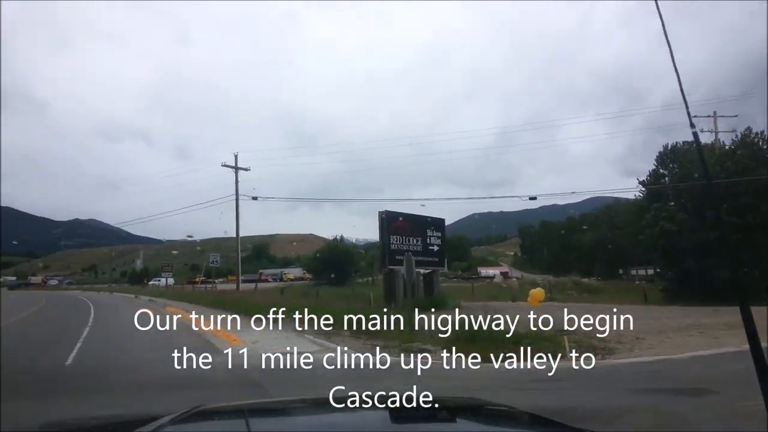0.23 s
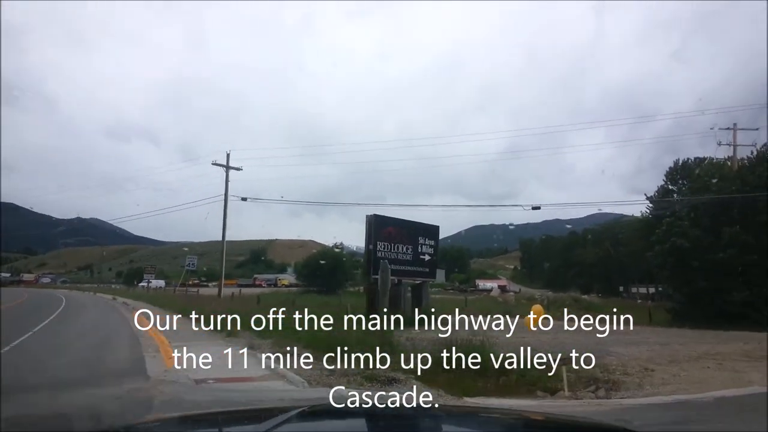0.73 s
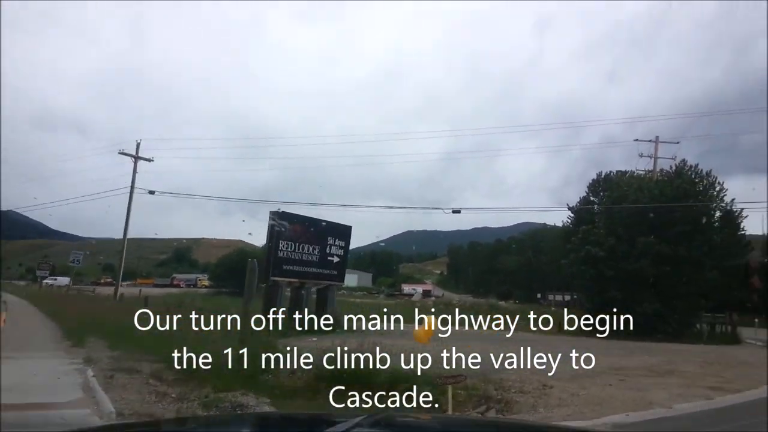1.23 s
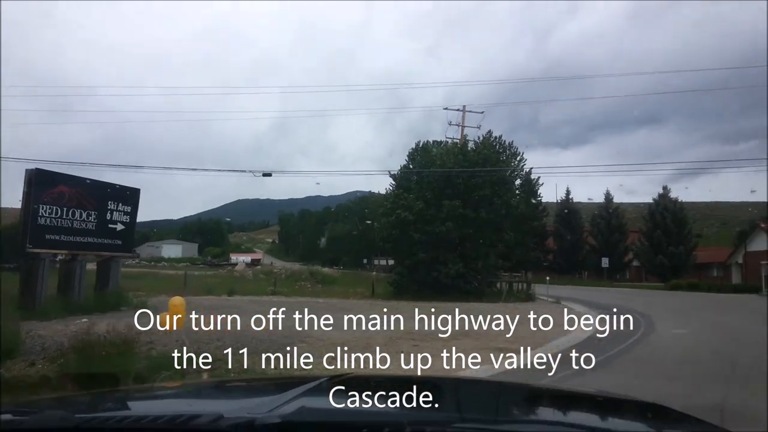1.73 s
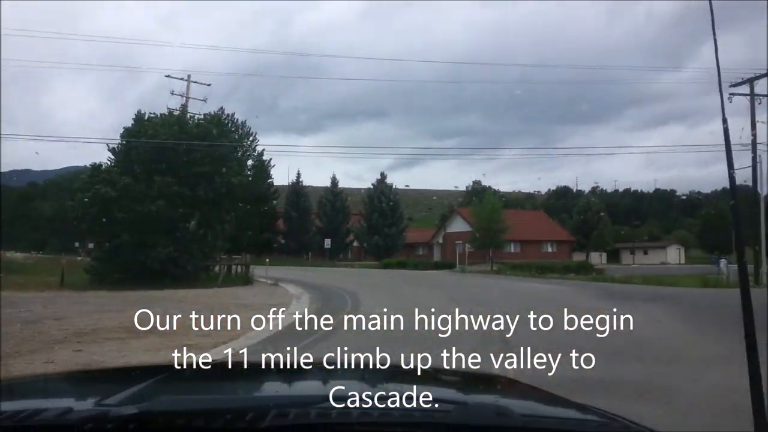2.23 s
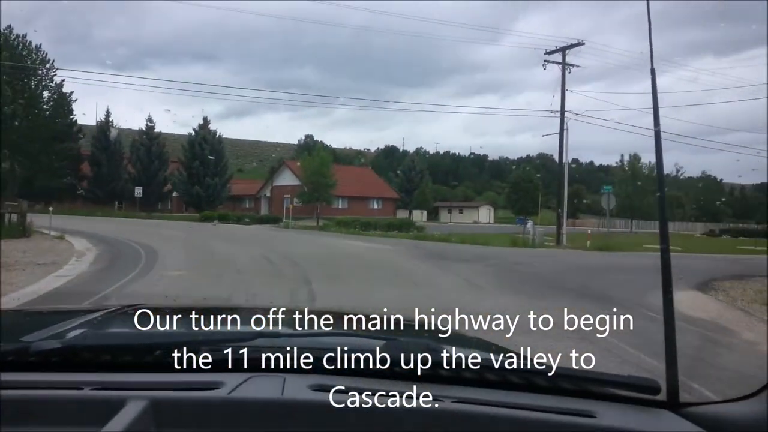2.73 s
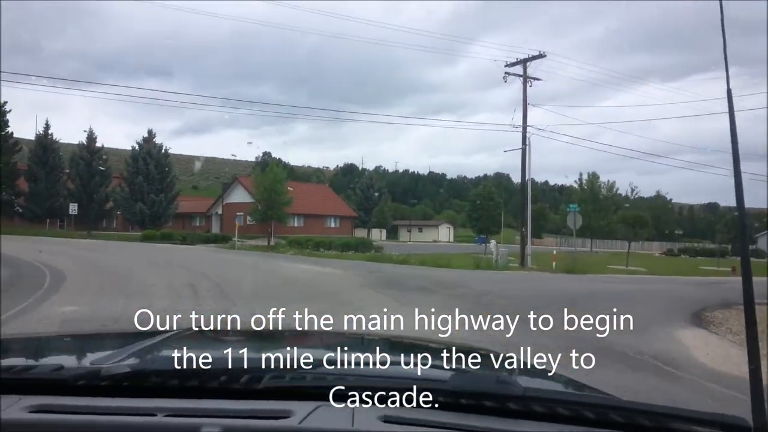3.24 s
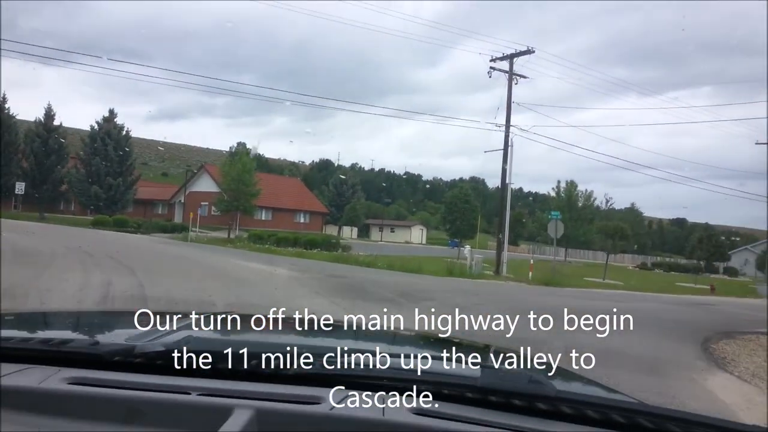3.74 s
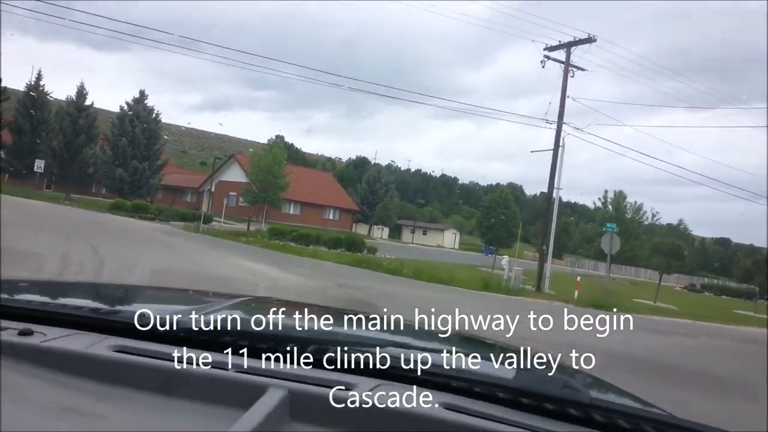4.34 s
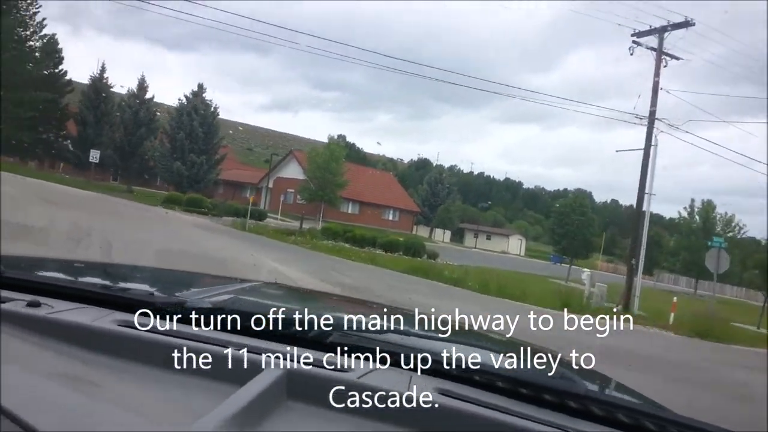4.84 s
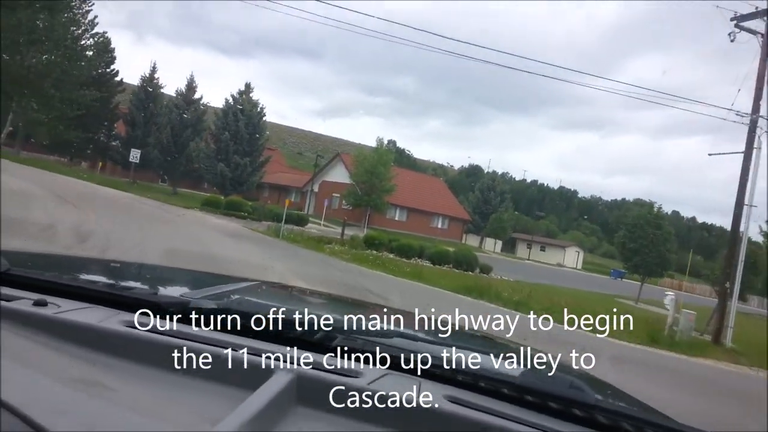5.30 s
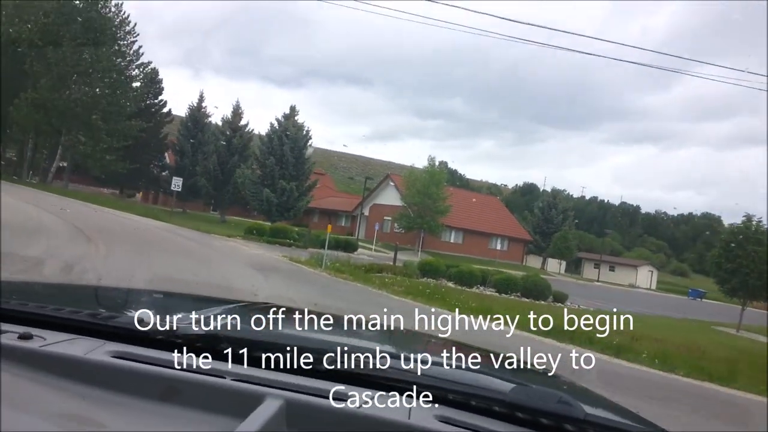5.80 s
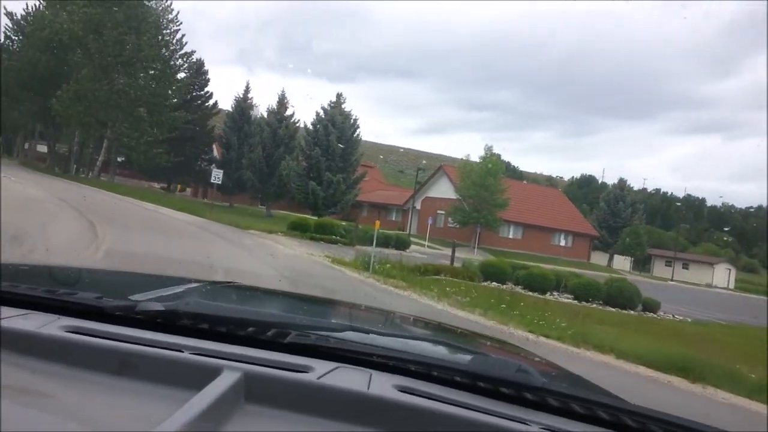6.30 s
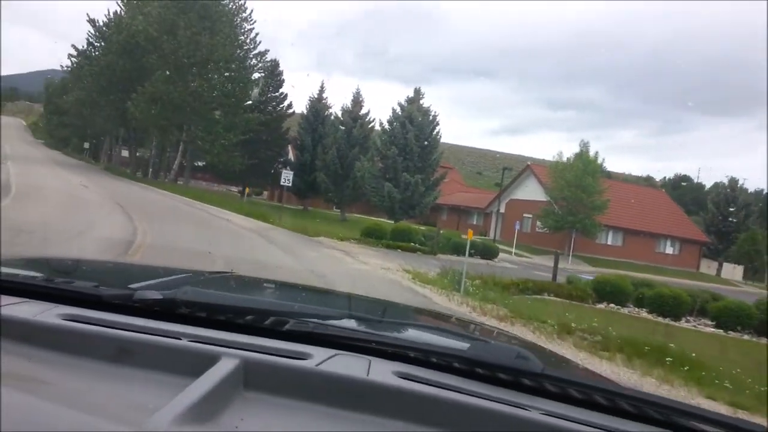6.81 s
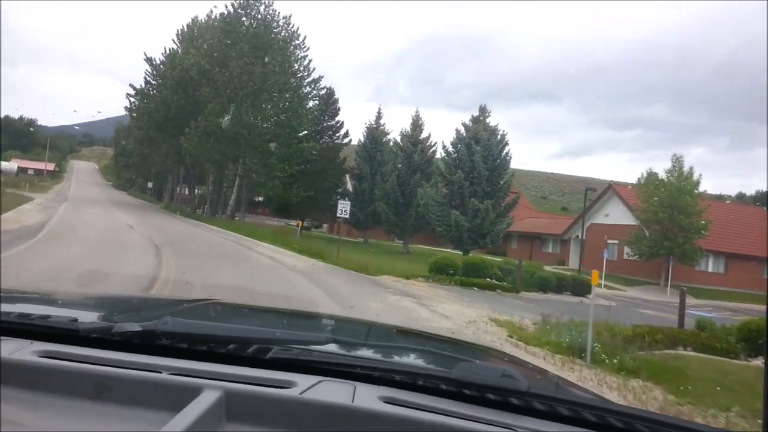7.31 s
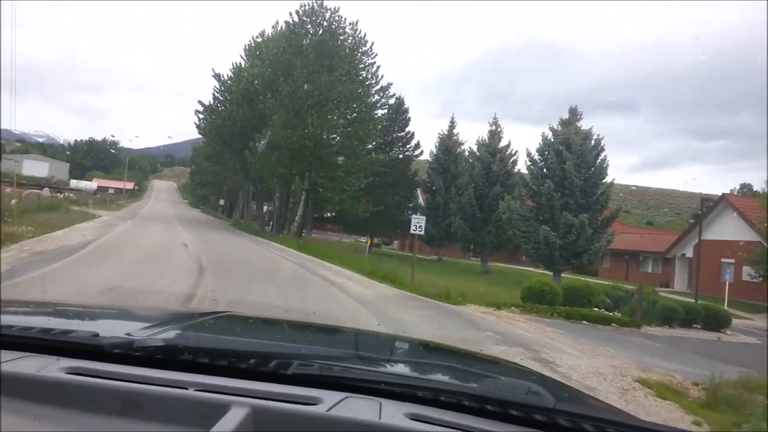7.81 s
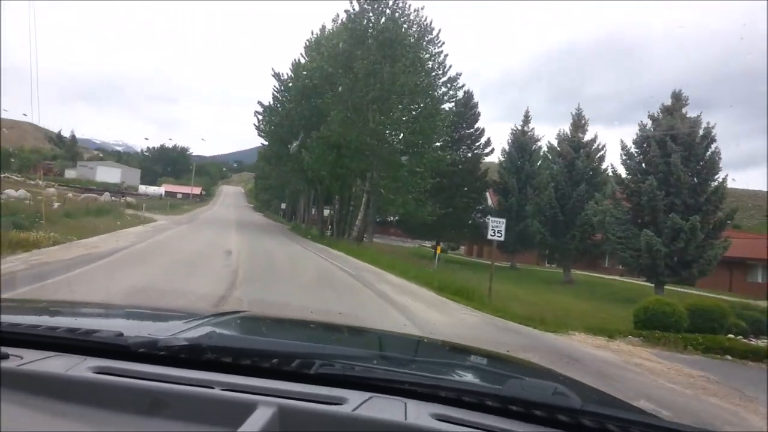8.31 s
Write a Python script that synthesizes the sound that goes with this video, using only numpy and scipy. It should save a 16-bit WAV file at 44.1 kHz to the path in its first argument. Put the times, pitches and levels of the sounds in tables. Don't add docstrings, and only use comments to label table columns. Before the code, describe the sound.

Inside a car taking a turn, loose trim rattles and tyres thump over joints while the indicator relay ticks. The indicator stalk snaps back sharply, and the engine takes up load, climbing from a low boom to a buzzy, steady drone. Road rumble and airy hiss fill in behind, with a few knocks of cabin parts. A small close microphone in the cabin hears mono bass and wide treble.

```python
import sys
import numpy as np
from scipy import signal
from scipy.io import wavfile
from scipy.ndimage import uniform_filter1d

SR = 44100
rng = np.random.default_rng(int(sys.argv[2]) if len(sys.argv) > 2 else 0)


def generate_wav(signal):
    frames = np.transpose(np.atleast_2d(signal))
    scaled = np.clip(frames, -1, 1) * 32767
    pcm = np.round(scaled).astype(np.int16)
    wavfile.write(sys.argv[1], SR, pcm)


def amplitude_ratio(level_db):
    exponent = np.asarray(level_db, float) / 20
    return 10 ** exponent


N = 377055

# [t/s, firings per second/Hz, load level/dB]
ENGINE = [(1.75, 43.82, -9), (2.0, 49.49, -10), (2.12, 56.55, -13), (2.25, 60.28, -11), (2.38, 63.0, -8),
          (2.62, 65.07, -2), (2.85, 66.12, -4.5), (3.2, 69.06, -0.5), (3.42, 70.84, -0.5), (3.62, 72.55, 2),
          (3.8, 73.2, -0.5), (4.4, 73.9, 0), (4.6, 75.1, -1), (5.8, 78.18, 1), (6.3, 78.55, -0.5),
          (7.0, 80.25, -0.5), (7.6, 81.85, 2), (8.55, 84.3, 2)]
# [f/Hz, width/Hz, level/dB]
CABIN = [(63, 2.1, -45), (113, 10.4, -68), (138.3, 12.3, -49.5), (177.8, 12.5, -50.5), (217.5, 14, -57),
         (236, 5.8, -56.5), (256, 18, -59), (276, 12, -64.5), (324, 6.4, -62), (365, 13, -73),
         (380, 32, -65), (420.3, 8.6, -53.5), (460, 18, -68), (471, 4.6, -56), (500, 4.8, -54),
         (523, 13.5, -54), (557, 26, -61.5), (577, 11.5, -52.5), (628.6, 14, -52.5), (672.3, 16, -53),
         (742.0, 7.8, -59), (800, 12.6, -53), (870, 22, -57), (956, 6.7, -54.5)]
# [t/s, level/dB]
PACE = [(0, 0.5), (.38, -5), (.7, 0.5), (1.24, -4.5), (1.6, -7.5), (2.16, -1), (2.5, 0), (3.36, 3),
        (4.4, 5.5), (5.3, 6), (6.0, 5), (7.0, 7), (8.55, 7.5)]
# [f/Hz, level/dB]
ROAR = [(120, -40), (220, 0), (310, -2.5), (420, -2), (520, -7.5), (630, -9.5), (720, -9), (810, -6.5),
        (1000, -17.5), (1400, -39)]
# [f/Hz, level/dB]
TRIM = [(300, -33), (800, -2.5), (1100, -2.5), (1700, 3.5), (2300, -1.5), (3000, -3.5), (4000, -2),
        (6000, -25.5)]
# [f/Hz, left minus right/dB]
LEAN = [(60, -7), (110, 3), (200, -0.5), (380, 0), (700, -3), (1290, -1), (2380, -2), (4400, 4), (8120, -6),
        (15000, -2.5)]
SIDES = np.array([[1], [-1]])


def engine(count=15):
    # [harmonic, level/dB]
    standing_out = [(3, -13), (4, -6), (6, 10), (7, 8), (8, 4), (9, 14), (11, 13), (12, 8.5), (13, 8),
                    (14, 5.5), (15, 16), (16, -2), (17, 7), (18, 9.5), (19, 9), (20, 18), (21, 15.5),
                    (22, 12), (23, 5), (24, 12), (25, 15.5), (26, 2.5), (27, 12), (28, 11), (29, 6),
                    (30, 8), (31, 9), (32, 6.5), (33, 7), (34, 0), (35, -8), (36, 1), (37, 2.5), (38, 2),
                    (39, 2), (40, 3), (41, 0), (42, 3.5), (43, -1), (44, -8), (45, 0), (46, -3.5),
                    (47, 0.5), (48, 2), (49, 1), (50, -10), (51, -2), (52, -4.5), (53, -3.5), (54, 2),
                    (55, -9), (56, -8), (57, -5), (58, -14)]
    # [harmonic, level/dB]
    bark = [(20, 2.9), (30, 18.3), (35, 33), (50, 7.4)]
    # [f/Hz, level/dB]
    exhaust = [(44, -60), (50, -54), (56, -46), (60, -48), (63.5, -31.5), (70, -32), (78, -32),
               (83.5, -35.5)]
    # [f/Hz, level/dB]
    octave = [(88, -53), (99, -44), (106, -42), (114, -40), (131, -32), (139, -29.5), (150, -26),
              (159, -25), (167, -26.5)]
    # [t/s, width/s, level/dB]
    slack = [
        (2.62, 0.046, 1),
        (3.12, 0.051, -13.5),
        (3.62, 0.12, -9.5),
    ]
    controls = columns(ENGINE) + [np.arange(N) / SR, wander(hz=9.0)]
    hz, load_db, t, hunt = (c[::count] for c in controls)
    first_db = read(exhaust, hz)
    second_db = read(octave, 2 * hz) + sum(db * np.exp(-((t - s) / width) ** 2) for s, width, db in slack)
    own_level = {5: amplitude_ratio(first_db), 10: amplitude_ratio(second_db)}

    cycle_hz = hz / 5
    turn = 2 * np.pi * np.cumsum(cycle_hz * (1 + 0.0007 * hunt)) * count / SR
    harmonic_db = {round(k): db for k, db in standing_out}
    bark_db = {round(k): db for k, db in bark}
    opening = np.exp(-((t - 2.47) / 0.22) ** 2)
    out = np.zeros((2, len(hz)))
    for k, (start, spread, uneven) in enumerate(rng.standard_normal((62, 3)), 1):
        last_hz = k * cycle_hz[-1]
        level = modes(CABIN, k * cycle_hz) * amplitude_ratio(load_db + harmonic_db.get(k, 2.0 * uneven - 8.0))
        level = level * amplitude_ratio(bark_db.get(k, 0) * opening)
        level = own_level.get(k, level)
        apart = min(0.6, 0.0091 + 0.0009 * last_hz) * np.tanh(2 * spread) * SIDES
        lean = amplitude_ratio(read(LEAN, last_hz) / 2 * SIDES)
        out += lean * level * np.sqrt(2) * np.cos(k * turn + 9 * start + apart)
    running = np.clip((np.arange(N) / SR - ENGINE[0][0]) * 10, 0, 1)
    return signal.resample_poly(out, count, 1, axis=1)[:, :N] * running * amplitude_ratio(0.55 * wander(hz=24.4))


def driveline():
    # [t/s, width/s, level/dB, f/Hz]
    lurches = [(0.04, 0.042, -33.5, 76.4), (.22, 0.037, -36, 73.7), (.33, 0.051, -39, 79.3),
               (.43, 0.046, -33.5, 69.2), (.56, 0.034, -42, 73.1), (.72, 0.029, -40, 71.8),
               (.83, 0.039, -45, 66.2), (.95, 0.36, -40, 70), (1.5, 0.048, -36, 63),
               (1.68, 0.051, -40, 63.4), (2.3, 0.28, -36.5, 57.7)]
    # [t/s, f/Hz, level/dB]
    mount = [(1.98, 150, -36), (2.11, 153.5, -37), (2.2, 155.2, -39.5), (2.33, 162.1, -38.5),
             (2.44, 171.8, -32), (2.54, 170.6, -31), (2.64, 172, -44), (2.74, 169.6, -32),
             (2.9, 167.4, -49), (2.99, 169.9, -31), (3.06, 159.5, -42), (3.12, 154, -37), (3.22, 150, -31)]
    coast = drone(lurches, columns(lurches)[2], swells(lurches, floor_db=-47.0), width=6.5, fuzz=0.3)
    return coast + drone(mount, *columns(mount), width=6.0, fuzz=0.76)


def clicks():
    # [f/Hz, level/dB]
    snap = [(1500, -1), (2600, 10), (3800, 5), (5000, 8.5), (6000, 9), (7200, 6), (9200, 4), (12000, -1),
            (15000, 3)]
    # [f/Hz, left minus right/dB]
    ring_lean = [(1050, -8), (1750, -1), (2900, 0), (3800, 7), (4900, 15), (5600, -10), (7200, -8)]
    # [t/s, peak level/dB, ring f/Hz]
    rattles = [(0.0327, -30, 1720), (.0322, -33, 4900), (0.0398, -24.5, 2980), (0.2558, -28, 4890),
               (.2572, -27, 1660), (.2744, -31, 1690), (.41, -21.5, 2930), (0.417, -32, 1545),
               (0.479, -26, 4880), (0.7134, -25.5, 4870), (.7466, -29, 4920), (.829, -20, 2950),
               (2.591, -29, 5730)]
    # [t/s, peak level/dB, ring f/Hz]
    relay_on = [
        (1.1431, -28.5, 2170),
        (1.147, -36, 3800),
        (1.4218, -35.5, 2540),
        (1.8737, -29, 1720),
        (1.878, -30, 1810),
    ]
    # [t/s, peak level/dB, ring f/Hz]
    relay_off = [
        (0.793, -27.5, 1080),
        (1.5055, -33, 1114),
        (1.513, -34, 3320),
        (2.243, -26, 1860),
    ]
    # [t/s, peak level/dB, ring f/Hz]
    stalk = [
        (0.062, -30, 4900),
        (.18, -33, 2170),
        (2.523, -27, 3531),
        (2.528, -30, 1960),
        (2.5445, -24, 3700),
        (2.592, -29, 4360),
        (2.595, -25, 3870),
        (2.6199, -26, 3560),
    ]
    # [t/s, peak level/dB, ring f/Hz]
    knocks = [(0.5412, -32, 804), (0.5722, -30, 905), (0.616, -27, 935), (.646, -26, 960), (.68, -35, 800),
              (1.968, -32, 1740), (3.815, -24, 2180), (4.343, -28, 1700), (4.403, -37, 2130),
              (4.6591, -32, 1460), (4.756, -35, 1310), (5.9797, -26.5, 1800)]
    # [t/s, peak level/dB, ring f/Hz]
    pings = [(.04, -33, 6030), (.046, -33, 2930), (.0595, -34, 2800), (.0403, -46, 1950),
             (.0588, -30, 2200), (.2598, -27, 3000), (.387, -38, 1800), (.2748, -27, 4870),
             (.412, -29, 3300), (.492, -40, 4770), (.805, -35, 1500), (.4199, -28, 2420),
             (0.4795, -31, 1660), (.4823, -39, 3960), (.5417, -40, 2900), (.5412, -28, 1970),
             (.5721, -42, 2830), (.6155, -33, 2820), (.6479, -43, 1690), (.7143, -30, 1660),
             (.7153, -30, 3520), (0.7454, -35, 1900), (.83, -33, 6030), (0.829, -29, 2510),
             (.83, -34, 9350), (1.1448, -36, 6230), (1.147, -34, 10800), (1.452, -34, 1766),
             (1.8746, -46, 2560), (1.8736, -50, 5870), (2.2453, -36, 3080), (2.5242, -27, 1900),
             (2.55, -29, 2900), (2.604, -32, 3950), (2.963, -41, 678), (3.946, -43, 589), (4.151, -32, 596),
             (4.757, -27, 1540), (4.766, -35, 1620), (6.108, -40, 638), (6.171, -38, 517)]
    # [t/s, peak level/dB, ring f/Hz]
    hums = [
        (.175, -35, 2150),
        (1.526, -35, 2280),
        (2.552, -36, 3860),
    ]
    # [t/s, peak level/dB, ring f/Hz]
    tiny = [(.0395, -36, 1766), (.042, -26, 2620), (.0435, -27, 3704), (.0455, -29, 5512),
            (.0575, -29, 2153), (.4107, -26, 6029), (.4122, -27, 3747), (.4195, -26, 1740),
            (.421, -27, 3300), (.789, -25, 1820), (.8037, -26, 977), (1.149, -24, 1690),
            (1.1703, -31, 1723), (1.511, -34, 1500), (1.5136, -31, 1200), (1.519, -26, 1766),
            (1.8748, -39, 2713), (2.2495, -29, 1880), (2.5224, -29, 7100), (2.5224, -27, 4100),
            (2.5223, -12, 2940), (2.5234, -26, 1740), (2.5275, -25, 4930), (2.5293, -19, 2660),
            (2.536, -27, 2600), (2.537, -26, 4780), (2.5433, -25, 4091), (2.5433, -31, 2067),
            (.4112, -24, 2780), (.8295, -24, 2770), (1.5059, -21.5, 940), (2.5935, -29, 3780),
            (2.5488, -26, 3359), (2.5557, -29, 2924), (2.594, -32, 1766), (2.5996, -26, 3876),
            (4.351, -29, 1341), (4.7562, -23, 1920), (4.7607, -27, 1790), (4.401, -23.5, 870),
            (4.57, -24, 885), (4.665, -24, 877), (2.968, -27, 920), (2.98, -29, 926)]
    # [time to fall 60 dB/s, edge level/dB, ring share/0-1]
    sharing = [
        (.09, -6, .86),
        (.11, -10, .65),
        (.1, -19, .78),
        (.09, -11, .86),
        (.085, -21, .85),
        (.065, -20, .97),
        (.3, -25, .98),
        (.05, -30, .995),
    ]
    ticks = [(s + 0.0007, db + 3.0, hz) for s, db, hz in tiny]
    kinds = zip((rattles, relay_on, relay_off, stalk, knocks, pings, hums, ticks), sharing)

    body = noise(TRIM, 1200, 14000, patchy_db=2.5, size=256)
    edge = noise(snap, 5500, 14000, patchy_db=2.5, size=256)
    chatter = amplitude_ratio(0.66 * wander(hz=362.0))
    out = np.zeros((2, N))
    for s, db, hz, t60, top_db, share in (row + kind for rows, kind in kinds for row in rows):
        at, shape = burst(s - 0.001, max(t60, 0.01), rise_s=0.002)
        share = np.clip(share, 0, 1)
        t = np.arange(len(shape)) / SR
        struck = np.sqrt(2) * np.sin(2 * np.pi * hz * t - [[0.4], [0]]) * shape ** 1.2
        ring = 1.2 * struck + 0.3 * evened(resonate(edge[:, at] + body[:, at], hz, 280.0))
        ring = ring * amplitude_ratio(read(ring_lean, hz) / 2 * SIDES)
        rest = np.sqrt(1 - share ** 2) * body[:, at] + amplitude_ratio(top_db) * edge[:, at]
        out[:, at] += amplitude_ratio(db + top_db - 4.5) * np.exp(-t / 0.0015) * edge[:, at]
        out[:, at] += amplitude_ratio(db - 9.0) * shape * (share * ring + rest * chatter[at])
    return out


def bumps():
    # [t/s, peak level/dB, f/Hz, time to fall 60 dB/s, knock level over thump/dB]
    joints = [(0.023, -34, 170, .15, -24), (0.371, -27, 155, 0.12, -29), (0.436, -25, 155, 0.098, -29),
              (.46, -29, 224, 0.21, -29), (0.721, -29, 160, 0.23, -27), (0.268, -25.5, 210, 0.091, -16),
              (0.39, -33, 88.6, 0.092, -32), (.43, -36, 90, 0.073, -28), (0.505, -36.5, 128, 0.18, -4),
              (.95, -36, 302, 0.43, -11), (1.127, -23, 140, 0.053, -23), (1.1382, -12.5, 126, 0.07, -34),
              (1.122, -27, 500, 0.075, -14), (1.14, -30, 416, 0.12, -14), (.54, -32, 440, 0.087, -9),
              (0.264, -30, 400, 0.054, -9), (1.264, -27, 407, 0.097, -9.5), (1.282, -26, 169, .08, -21),
              (1.539, -26, 80.5, 0.11, -18), (2.96, -15, 160, 0.09, -24), (2.971, -19, 264, 0.12, -16),
              (3.024, -22, 190, .08, -25), (3.302, -30, 138.1, 0.12, -18), (3.94, -27.5, 581.6, 0.13, -12),
              (4.149, -28, 500.6, 0.054, -2), (4.752, -23, 424, 0.076, -4), (6.107, -41, 526.3, 0.06, -2),
              (6.171, -44, 521, 0.057, -7)]
    knock = noise(ROAR, 300, 900, patchy_db=-2.5, size=512)
    out = np.zeros((2, N))
    for s, db, hz, t60, knock_db in joints:
        at, shape = burst(s, max(t60, 0.02), rise_s=0.0026)
        thump = np.sin(2 * np.pi * np.cumsum(hz * (0.65 + 0.727 * shape)) / SR)
        out[:, at] += amplitude_ratio(db - 1.5) * (shape * thump + amplitude_ratio(knock_db) * shape ** 0.5 * knock[:, at])
    return out


def rustle():
    # [t/s, width/s, level/dB]
    shifts = [(.1, 0.07, -44.5), (.56, 0.44, -48.5), (.68, .07, -60), (.79, 0.039, -43.5),
              (1.12, 0.074, -48.5), (1.25, 0.096, -54), (2.0, 0.18, -62), (2.7, 0.2, -52), (4.38, 0.1, -49)]
    size = amplitude_ratio(4.4 * np.minimum(rng.exponential(1, N), 3))
    hits = size * (rng.random(N) < 170.0 / SR)
    decay = amplitude_ratio(-60 * np.arange(2000) / SR / 0.35)
    grains = evened(signal.oaconvolve(hits, decay)[:N])
    return amplitude_ratio(swells(shifts, floor_db=-60)) * grains * noise(TRIM, 600, 4000, patchy_db=3.0, size=256)


def palms():
    # [t/s, width/s, level/dB]
    squeeze = [
        (1.25, 0.042, -62),
        (2.14, 0.065, -55),
        (2.28, 0.084, -50),
        (2.64, 0.046, -59),
    ]
    # [f/Hz, level/dB]
    skin = [(4000, -14), (6500, -34), (9000, 0.5), (12000, 5), (15000, 4)]
    top_db = hands_db()
    floor_db = top_db - 4.5 + 0.91 * np.minimum(top_db + 54.5, 0)
    return amplitude_ratio(swells(squeeze, floor_db)) * noise(skin, 6000, 13600, 0.91, size=512)


def road_rumble():
    # [f/Hz, level/dB]
    rumble = [(25, -32), (45, -23), (62, -3.5), (80, 3), (100, -10), (135, 2.5), (165, 3), (200, -9.5),
              (260, -8.5), (340, -17), (500, -46)]
    # [t/s, width/s, level/dB]
    rough = [
        (.5, 0.28, -59),
        (1.15, 0.048, -50),
        (1.85, 0.12, -54.5),
    ]
    pace_db, = columns(PACE)
    rumble_db = swells(rough, -53 + 0.23 * pace_db)
    return amplitude_ratio(rumble_db) * noise(rumble, 88, 112, patchy_db=1.1, size=2048)


def road_roar():
    pace_db, = columns(PACE)
    throb = 1 + 0.12 * np.cos(2 * np.pi * np.cumsum(columns(ENGINE)[0]) / SR)
    panels = [(f, width, 2.0) for f, width, _ in CABIN]
    roar = noise(ROAR, 140, 1000, 0.3, size=4096, rings=lambda hz: 0.5 + modes(panels, hz))
    return amplitude_ratio(-42 + 0.55 * pace_db) * throb * roar


def hiss():
    # [f/Hz, level/dB]
    air_colour = [(500, -69), (900, 5), (1300, 4.5), (1800, 1.5), (2300, -4.5), (2700, -6), (3500, -10.5),
                  (4600, -11), (5200, -19.5), (7000, -37)]
    # [f/Hz, level/dB]
    slide = [(2500, -1), (4500, -1), (6000, 1), (8000, 1), (10000, -3), (12500, -2.5), (15000, -5),
             (18000, -2)]
    # [f/Hz, width/Hz, level over the hiss/dB]
    dash = [(1550, 80, 0), (1870, 80, 0), (2190, 30, 6), (2900, 120, 0), (3320, 60, 0), (3680, 30, 7),
            (4500, 110, 4), (5130, 60, -2), (6920, 80, -2), (2290, 25, 2), (3520, 25, 2), (3890, 30, 2),
            (5540, 40, 2), (9630, 25, 3)]
    pace_db, = columns(PACE)
    gust = amplitude_ratio(0.5 * wander(hz=30.0))
    air = noise(air_colour, 880, 6200, 1.0, size=2048, rings=lambda hz: 1 + modes(dash, hz))
    top = noise(slide, 7570, 11400, 1.0, rings=lambda hz: 1 + modes(dash, hz))
    return gust * (amplitude_ratio(-48.5 + 0.45 * pace_db) * air + amplitude_ratio(hands_db() - 2.0) * top)


def hands_db():
    # [t/s, width/s, level/dB]
    hands = [(.1, 0.051, -53.5), (.33, 0.058, -52), (.45, 0.042, -50), (.6, 0.015, -59), (.8, 0.047, -52.5),
             (1.0, 0.039, -59), (1.235, 0.02, -55), (1.29, 0.059, -57.5), (2.15, 0.066, -57),
             (2.27, 0.043, -54), (2.45, 0.2, -57.5), (2.62, 0.04, -50.5), (2.85, 0.29, -57.5),
             (3.93, 0.026, -48.5), (4.5, 0.17, -57.5), (8.13, 0.045, -60)]
    return swells(hands, -61 + 0.57 * columns(PACE)[0])


def noise(shape, lo_hz, hi_hz, patchy_db, size=1024, rings=lambda hz: 1):
    # [f/Hz, likeness/0-1]
    likeness = [(30, 0.93), (150, 1), (250, 0.7), (500, 0.48), (1000, 0.32), (2000, 0.35), (4000, 0.031),
                (8000, 0.085), (14000, 0.076)]
    frames, hz = 4 * N // size + 5, np.fft.rfftfreq(size, 1 / SR)
    a, b, c, d, patches = rng.standard_normal((frames, len(hz), 5), np.float32).T
    patches = uniform_filter1d(uniform_filter1d(patches, size=10, axis=0), size=10, axis=1)
    patches = evened(patches)
    same = np.clip(read(likeness, hz), 0, 1)[:, None]
    lag = 2 * np.pi * 0.000364 * hz * np.clip(hz / 1050.0 - 0.4, 0, 1)
    left = a + 1j * b
    right = same * left * np.exp(1j * lag)[:, None] + np.sqrt(1 - same ** 2) * (c + 1j * d)
    lean = amplitude_ratio(read(LEAN, hz) / 2)[:, None]
    level = amplitude_ratio(read(shape, hz)) * rings(hz)
    z = np.array([left * lean, right / lean]) * level[:, None] * amplitude_ratio(patchy_db * patches)
    inside = np.sum(level[(hz > lo_hz) & (hz < hi_hz)] ** 2) / np.sum(level ** 2)
    sound = signal.istft(z.astype(np.complex64), nperseg=size, noverlap=3 * size // 4)[1][:, :N]
    return evened(sound) / np.sqrt(inside)


def drone(rows, hz, db, width, fuzz):
    t = np.arange(N) / SR
    boom = evened(resonate(resonate(rng.standard_normal(N), hz, width), hz, width))
    steady = np.sqrt(2) * np.cos(2 * np.pi * np.cumsum(hz) / SR)
    fade_in = np.clip((t - rows[0][0]) * 10 + (rows[0][0] < 0.1), 0, 1)
    fade_out = np.clip((rows[-1][0] - t) * 10, 0, 1)
    return amplitude_ratio(db) * (fuzz * boom + np.sqrt(1 - min(fuzz, 1) ** 2) * steady) * fade_in * fade_out


def burst(s, t60, rise_s):
    start = round(s * SR)
    t = np.arange(min(round(0.3 * SR), N - start)) / SR
    return slice(start, start + len(t)), (1 - np.exp(-t / rise_s)) * amplitude_ratio(-60 * t / t60)


def modes(table, hz):
    return np.sqrt(sum(amplitude_ratio(2 * db) / (1 + (2 * (hz - f) / width) ** 2) for f, width, db in table))


def resonate(x, hz, width):
    turn = np.exp(2j * np.pi * np.cumsum(hz * np.ones(x.shape[-1])) / SR)
    r = np.exp(-np.pi * width / SR)
    return 2 * (turn * signal.lfilter([1 - r], [1, -r], x / turn)).real


def swells(rows, floor_db, count=50):
    t = np.arange(0, N, count) / SR
    power = sum(amplitude_ratio(2 * db) * np.exp(-((t - s) / width) ** 2) for s, width, db, *_ in rows)
    return 10 * np.log10(amplitude_ratio(2 * floor_db) + np.interp(np.arange(N) / SR, t, power))


def wander(hz):
    return evened(signal.sosfilt(signal.butter(2, hz, fs=SR, output="sos"), rng.standard_normal(N)))


def columns(rows):
    s, *values = np.transpose(rows)
    return [np.interp(np.arange(N) / SR, s, v) for v in values]


def read(points, hz):
    f, value = np.transpose(points)
    return np.interp(np.log(hz + 1), np.log(f + 1), value)


def evened(x):
    return x / np.sqrt(np.mean(x ** 2) + 1e-20)


def scene():
    car = engine() + driveline() + bumps()
    small_parts = clicks() + rustle() + palms()
    return car + small_parts + road_rumble() + road_roar() + hiss()


def band_limit(x):
    return signal.sosfilt(signal.butter(12, 15690, fs=SR, output="sos"), x)


def record(dry):
    heard = signal.sosfilt(signal.butter(3, 44.0, "high", fs=SR, output="sos"), dry)
    top_cut = signal.firwin(401, 14570, window=("kaiser", 6), fs=SR)
    heard = signal.oaconvolve(heard, top_cut[None], "same", axes=1)
    return band_limit(heard)


dry = scene()
out = record(dry)
generate_wav(out)
```